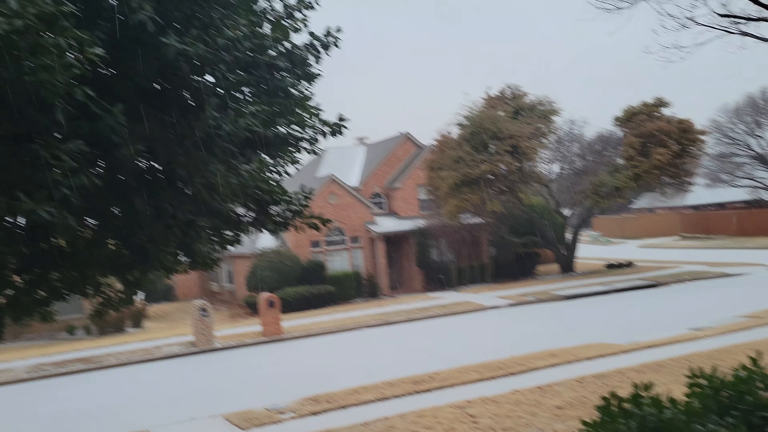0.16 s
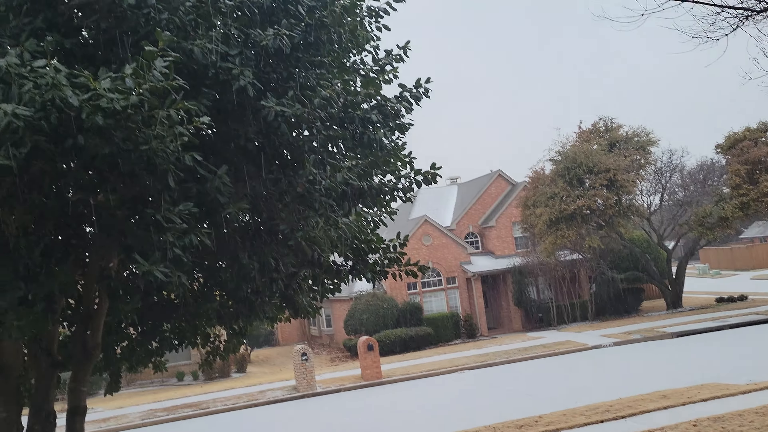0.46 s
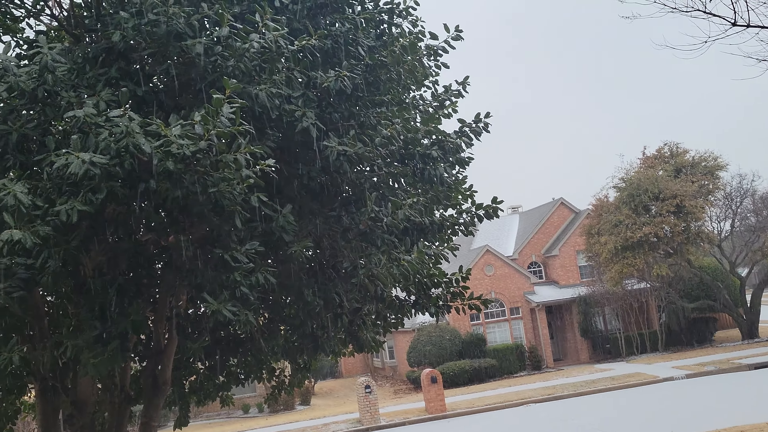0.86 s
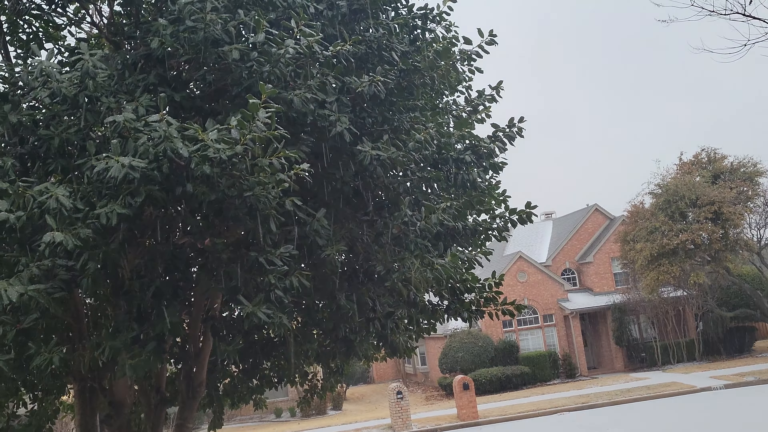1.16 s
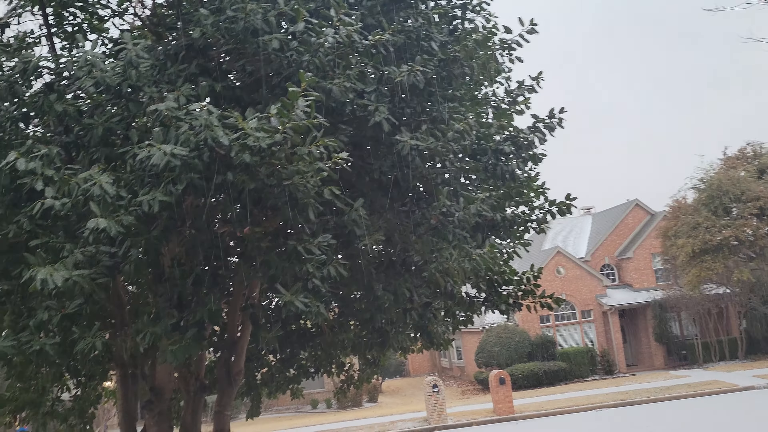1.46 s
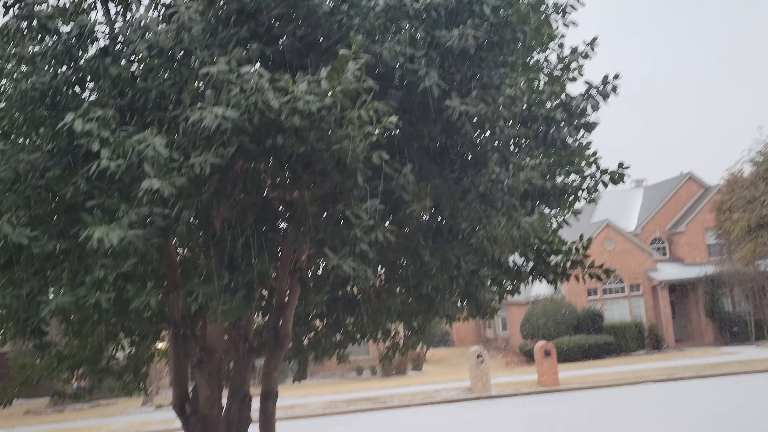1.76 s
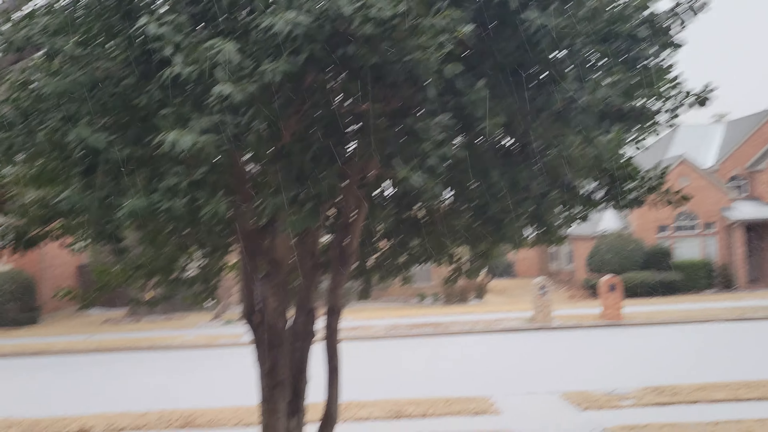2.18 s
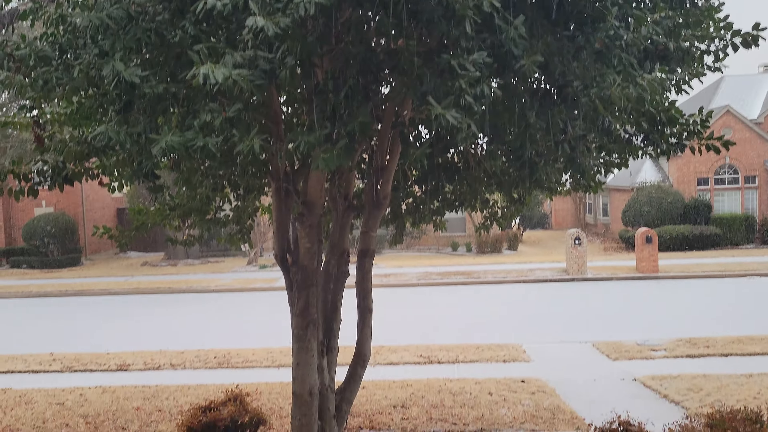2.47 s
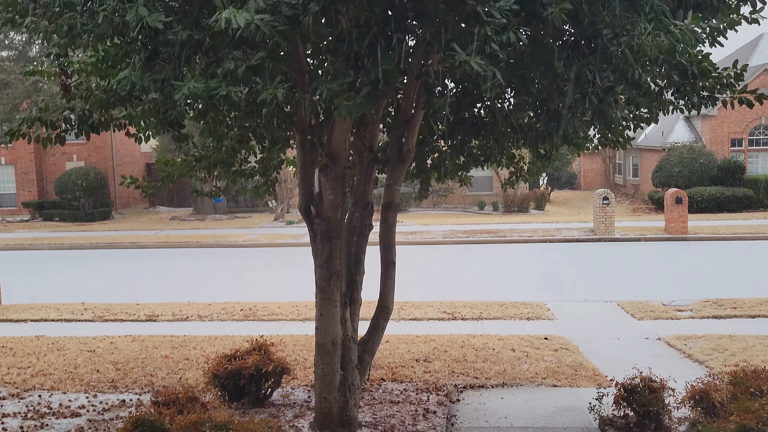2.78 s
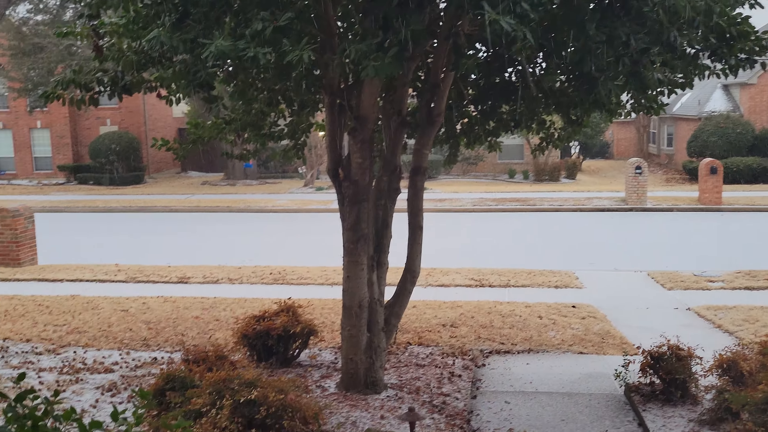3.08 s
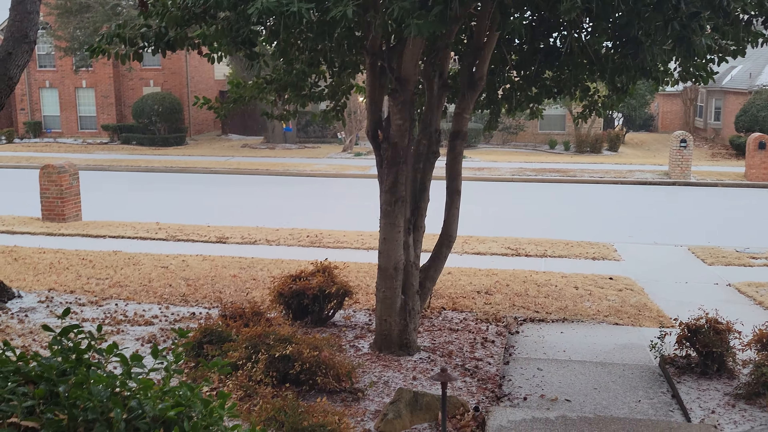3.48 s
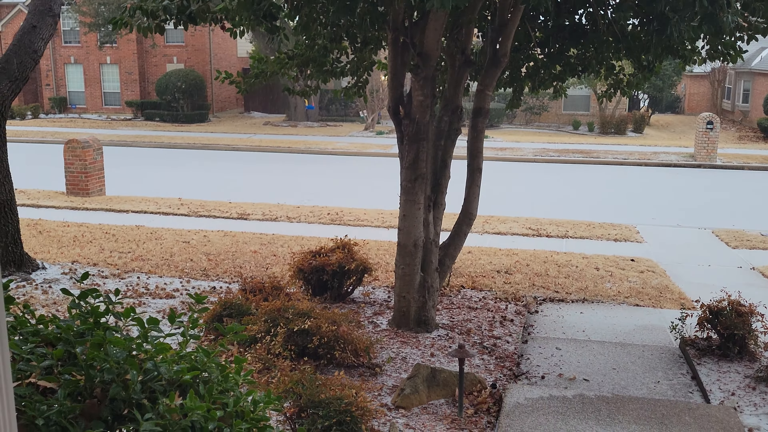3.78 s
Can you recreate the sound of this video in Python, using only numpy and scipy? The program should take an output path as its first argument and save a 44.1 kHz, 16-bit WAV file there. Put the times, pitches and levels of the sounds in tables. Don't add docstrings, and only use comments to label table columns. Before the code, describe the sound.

Heavy sleet falls in a bright, crisp, unbroken hiss of countless tiny ice ticks.

```python
import sys
import numpy as np
from scipy import signal
from scipy.fft import rfft, irfft, next_fast_len
from scipy.io import wavfile
from scipy.ndimage import uniform_filter1d, map_coordinates

SR = 44100
rng = np.random.default_rng(int(sys.argv[2]) if len(sys.argv) > 2 else 0)


def ratio(d):
    e = np.asarray(d, float) / 20
    return 10 ** e


def generate_wav(signal):
    frames = np.transpose(np.atleast_2d(signal))
    scaled = np.clip(frames, -1, 1) * 32767
    pcm = np.round(scaled).astype(np.int16)
    wavfile.write(sys.argv[1], SR, pcm)


N = 173313


def unit(x):
    return x / np.sqrt(np.mean(x ** 2) + 1e-20)


def along(points, hz):
    point_hz, value = np.transpose(points)
    return np.interp(np.log(hz + 1), np.log(point_hz + 1), value)


def wobble(rate):
    points = rng.standard_normal(int(N * rate / SR) + 4)
    return map_coordinates(points, [np.arange(N) * rate / SR])


def filtered(x, response):
    size = next_fast_len(N + 8192)
    hz = np.fft.rfftfreq(size, 1 / SR)
    return irfft(rfft(x, size) * response(hz), size)[..., :N]


# frequency in Hz, likeness from -1 to 1 [no unit].
SKEW = [(60, -0.14), (450, -.11), (1500, -0.14), (4100, -.12), (6000, -0.12), (9000, -0.0074)]


def spread(pair, alike):
    def mix(hz):
        like = np.clip(alike(hz), -0.97, 0.97) + 1j * along(SKEW, hz)
        rest = np.sqrt(np.clip(1 - abs(like) ** 2, 0, 1))
        return np.array([like, rest])

    shared, own = filtered(pair, mix)
    return np.array([pair[0], shared + own])


def patchy(x, depth_db):
    z = signal.stft(x, nperseg=512)[2]
    field = rng.standard_normal(z.shape[1:])
    field = uniform_filter1d(field, size=12, axis=0)
    field = uniform_filter1d(field, size=8, axis=1)
    return signal.istft(z * ratio(depth_db * unit(field)), nperseg=512)[1][:, :N]


# frequency in Hz, likeness from -1 to 1 [no unit].
ALIKE = [(160, 0.71), (270, -0.042), (450, 0.045), (740, -0.32), (1250, -0.53), (1650, -0.56),
         (2050, -0.072), (5500, 0.023)]


def far_pellets():
    pellets_per_s, size_spread_db = 21000, 3
    hit = rng.random((2, N)) < pellets_per_s / SR
    push_or_pull = rng.choice([-1, 1], (2, N))
    size = ratio(size_spread_db * rng.standard_normal((2, N)))
    ticks = patchy(hit * push_or_pull * size, depth_db=0.68)
    return unit(spread(ticks, lambda hz: along(ALIKE, hz)))


def near_pellets():
    pellets_per_s, size_spread_db = 1500, 4
    middle_hz, pitch_spread_octaves, ring_cycles = 11000, 0.66, 1.5
    port_gap_s = 0.00047
    count = int(pellets_per_s * N / SR)
    place, vary = rng.random((count, 2)), rng.standard_normal((count, 2))
    hz = np.clip(middle_hz * 2 ** (pitch_spread_octaves * vary[:, :1]), 600, SR / 2.5)
    size = ratio(size_spread_db * vary[:, 1:])
    side = 2 * place[:, 1:] - 1
    out = []
    for ear in (-1, 1):
        start = place[:, :1] * N + 32 + ear * side * port_gap_s * SR / 2
        at = np.floor(start).astype(int) + 1 + np.arange(96)
        t = (at - start) / SR
        loudness = size * (1 - 0.43 * ear * side)
        ring = loudness * np.sin(2 * np.pi * hz * t) * np.exp(-t * hz / ring_cycles)
        out.append(np.bincount(at.ravel(), ring.ravel(), N + 256)[:N])
    return unit(np.array(out))


# time in seconds, sleet strength in dB, turn towards the leaves in dB.
FALL = [
    (0, -27.5, -1.5),
    (.32, -28.5, -1.5),
    (.8, -28, -0.5),
    (1.38, -28.5, -0.6),
    (1.6, -28.5, -0.8),
    (2.2, -28.5, 1.1),
    (2.8, -28.5, 1),
    (3.3, -28.5, 2),
    (3.93, -28, .5),
]
# frequency in Hz, level in dB.
ICE = [(250, -30), (500, -16.5), (700, -13.5), (760, -10.5), (950, -11), (1300, -7.5), (2150, -7),
       (2800, -3)]
# frequency in Hz, added level in dB.
FIZZ = [(13500, 0), (14500, 1), (15700, 1.6)]
# frequency in Hz, added level in dB.
LEFT_PORT = [(1500, -1), (2000, -1.5), (4800, -1), (7500, 3.8), (8400, -3), (10300, -3), (12700, 3.9),
             (15650, 3)]
# frequency in Hz, added level in dB.
RIGHT_PORT = [(1500, 1), (4800, 4), (6200, 6), (8100, 5.5), (9500, -6), (11400, -3), (12300, 5.5),
              (15650, 1)]


def sleet():
    far_db, near_db = 3.5, -11.5
    flurry_db, flutter_db = 0.02, 0.13
    leaf_hz, leaf_width_hz = 9700, 1800
    s, db, turn_db = np.transpose(FALL)
    t = np.arange(N) / SR
    level_db = np.interp(t, s, db) + flurry_db * wobble(3.1) + flutter_db * wobble(14)
    shower = ratio(far_db) * far_pellets() + ratio(near_db) * near_pellets()

    def colour(hz):
        ports_db = np.array([along(LEFT_PORT, hz), along(RIGHT_PORT, hz)])
        return ratio(along(ICE, hz) + along(FIZZ, hz) + ports_db)

    hiss = unit(filtered(shower, colour))
    leaves = filtered(hiss, lambda hz: np.exp(-((hz - leaf_hz) / leaf_width_hz) ** 2))
    turn = ratio(np.interp(t, s, turn_db)) - 1
    return ratio(level_db + 4.5) * (hiss + turn * leaves)


def noise(gain):
    return unit(filtered(rng.standard_normal((2, N)), gain))


# frequency in Hz, level in dB per Hz.
TRAFFIC = [(12, -36), (20, -5), (43, -0.5), (65, -2.5), (88, -1.5), (135, -10.5), (180, -37), (300, -120)]
# frequency in Hz, width in Hz, level in dB.
HUM = [(37, 2.4, -75), (55.6, 2.3, -57.5), (77.2, 5.9, -66), (90, 4.1, -63), (118.7, 5.6, -67)]


def rumble():
    level_db, swell_db = -56.5, 1.3
    deep = ratio(level_db + swell_db * wobble(3.94)) * noise(lambda hz: ratio(along(TRAFFIC, hz)))
    for hum_hz, width_hz, db in HUM:
        deep = deep + ratio(db) * noise(lambda hz: np.exp(-((hz - hum_hz) / width_hz) ** 2))
    return spread(deep, lambda hz: 0.93 + 0 * hz)


# time in seconds, level in dB.
ROAD = [(0.0, -70), (0.12, -66), (0.46, -66), (0.56, -58), (0.93, -69), (1.04, -63.5), (1.67, -63.5),
        (1.7, -60), (1.95, -68), (2.93, -64), (3.02, -71), (3.7, -62.5), (3.9, -78), (3.93, -66)]
# frequency in Hz, level in dB per Hz.
TYRES = [(79, -37), (135, -5), (161, -2.5), (199, -0.5), (307, -3.5), (420, -5), (550, -56), (920, -120)]


def tyres():
    level_db, follow = -65.5, 0.98
    s, road_db = np.transpose(ROAD)
    swell_db = follow * np.interp(np.arange(N) / SR, s, road_db - road_db.mean())
    drone = ratio(level_db + swell_db) * noise(lambda hz: ratio(along(TYRES, hz)))
    return spread(drone, lambda hz: 0.88 + 0 * hz)


def traffic():
    pan_db = -1.1
    return (rumble() + tyres()) * ratio([[pan_db / 2], [-pan_db / 2]])


def scene():
    return sleet() + traffic()


def low_pass(x):
    return signal.sosfilt(signal.butter(12, 15750, fs=SR, output="sos"), x)


def record(dry):
    return low_pass(dry)


dry = scene()
out = record(dry)
generate_wav(out)
```